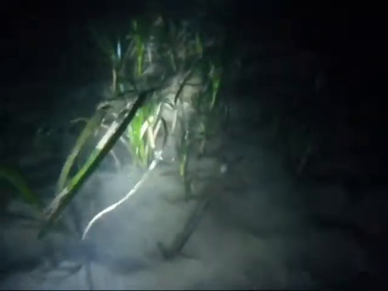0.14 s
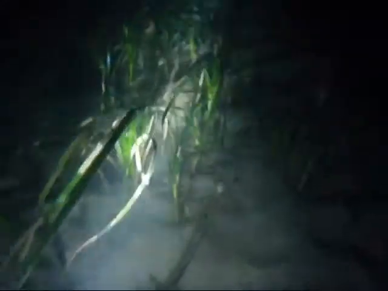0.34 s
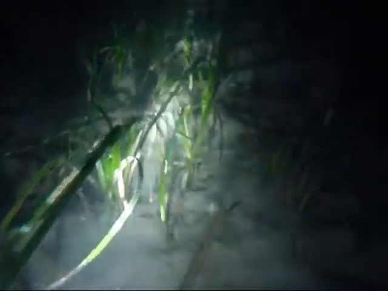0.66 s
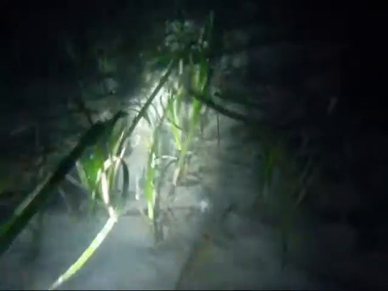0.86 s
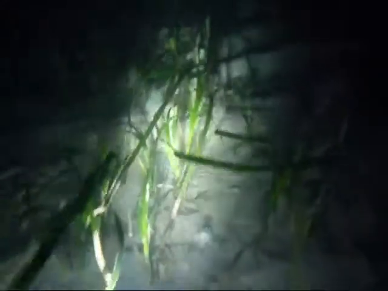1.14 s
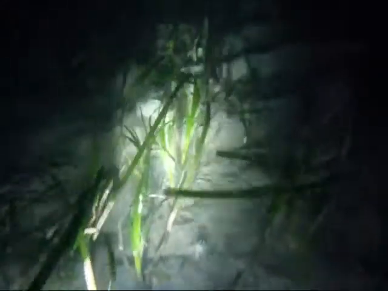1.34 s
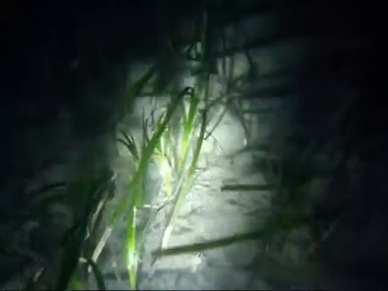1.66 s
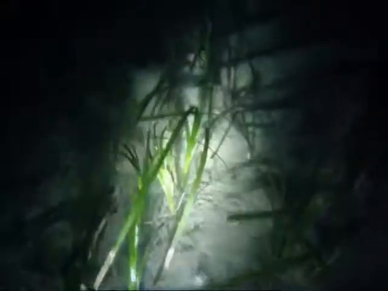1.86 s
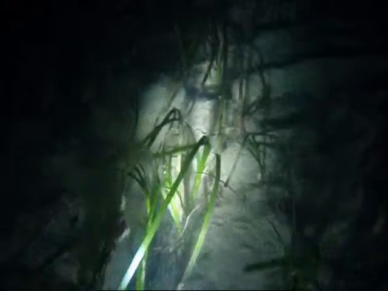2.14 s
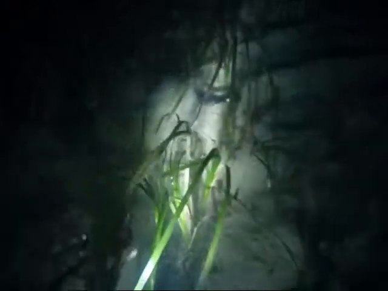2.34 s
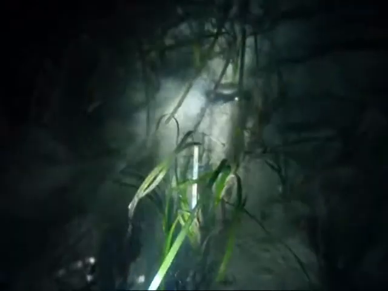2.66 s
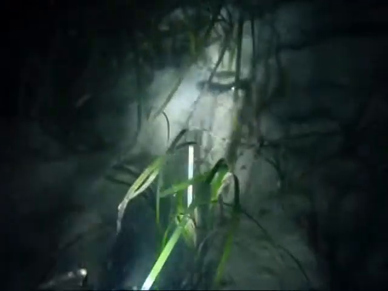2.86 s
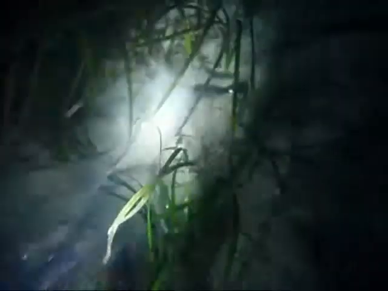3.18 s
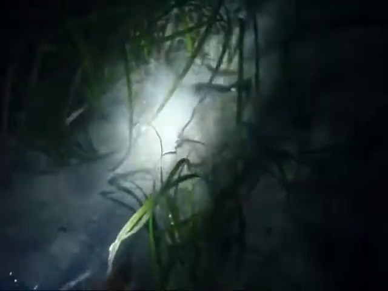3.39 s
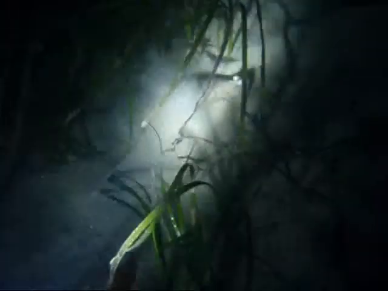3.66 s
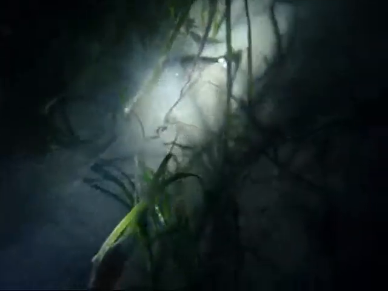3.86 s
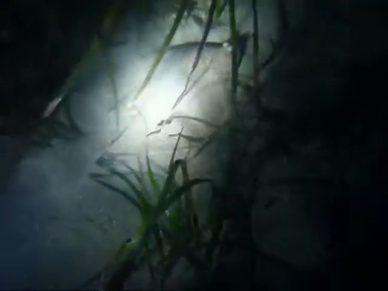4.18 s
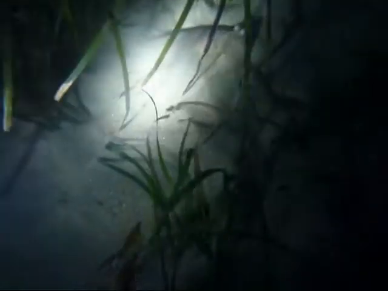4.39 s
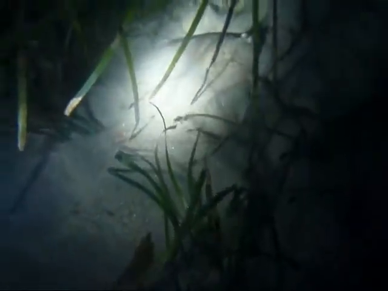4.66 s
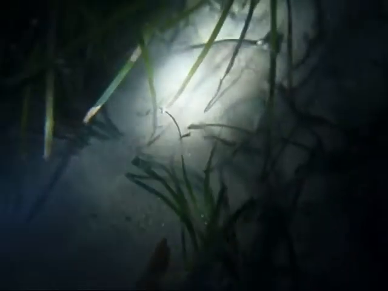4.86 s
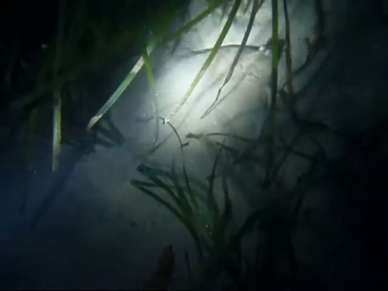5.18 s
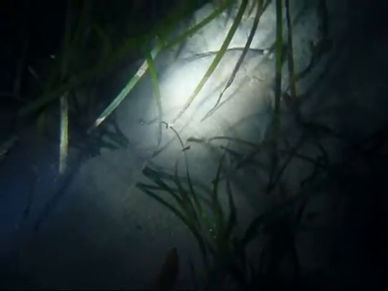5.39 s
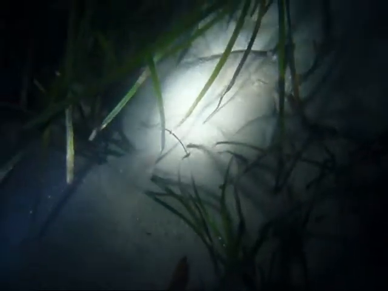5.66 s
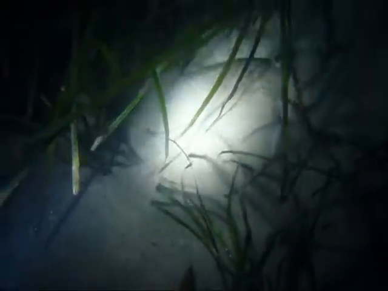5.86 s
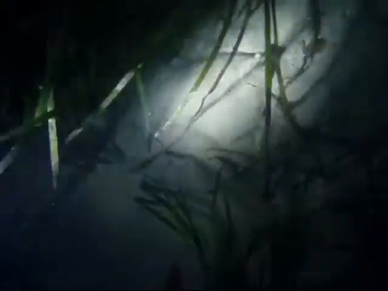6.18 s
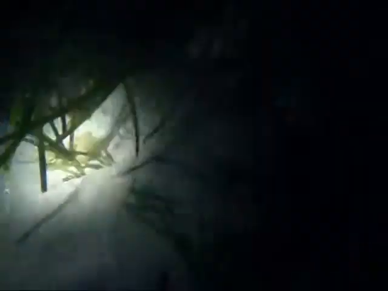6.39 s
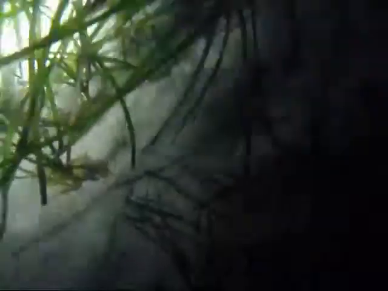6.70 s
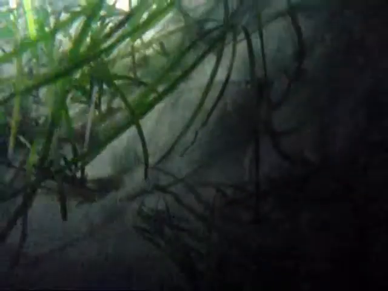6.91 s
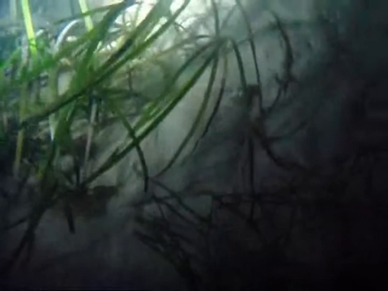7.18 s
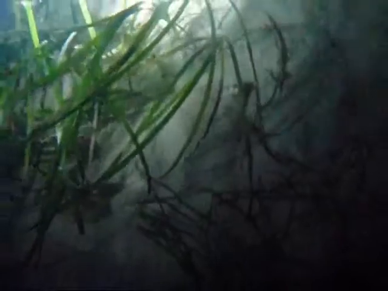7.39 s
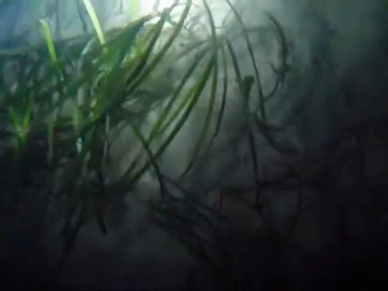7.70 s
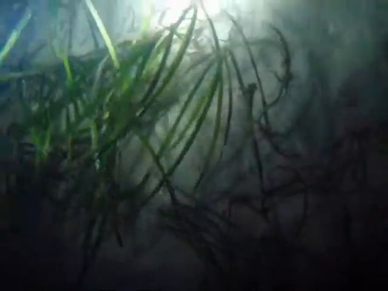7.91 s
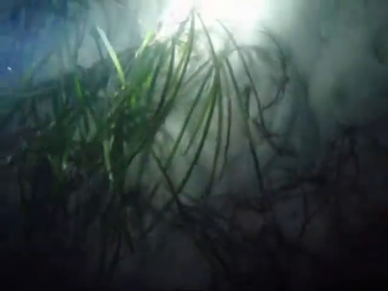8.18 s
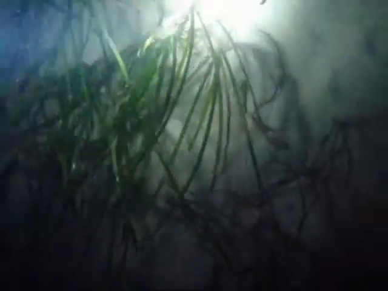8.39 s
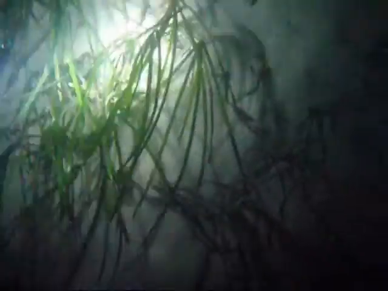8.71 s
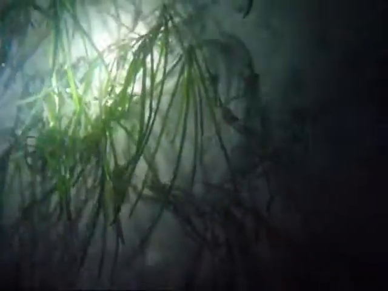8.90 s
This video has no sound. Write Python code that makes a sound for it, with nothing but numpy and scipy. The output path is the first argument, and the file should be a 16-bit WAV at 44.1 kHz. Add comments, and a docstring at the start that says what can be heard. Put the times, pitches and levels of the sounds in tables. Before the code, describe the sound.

A hand fumbles with a waterproof camera near the seabed. Very close, dull knocks ring briefly and sag in pitch, some with deep soft thumps. They begin sparse and quiet, bunch up several times, and end in weak taps after a strong knock around eight seconds. Soft friction, tiny stick-slip creaks and rising bubble blips fill gaps over constant crude microphone hiss.

```python
"""Fingers knock on a diver's sealed camera housing: short, damped, sagging tones, mostly under 1 kHz.
The hand also shoves it (slow, low blows), creaks along it (runs of small blows) and rubs it (shaped noise).
A few air bubbles blip nearby as rising, fading tones, over a steady microphone hiss of shaped noise.
The recorder keeps slow, coarse samples and holds each one, which puts a thin fizz on the knocks."""
import sys
import numpy as np
from scipy import signal
from scipy.fft import rfft, irfft, next_fast_len
from scipy.io import wavfile
from scipy.ndimage import uniform_filter1d

SR = 44100
rng = np.random.default_rng(int(sys.argv[2]) if len(sys.argv) > 2 else 0)


def master_out(mix):
    """Clip the mix to full scale and print it as 16-bit PCM to the path in sys.argv[1]."""
    frames = np.transpose(np.atleast_2d(mix))
    ceiling = np.clip(frames, -1, 1)
    pcm = np.round(ceiling * 32767).astype(np.int16)
    wavfile.write(sys.argv[1], SR, pcm)


N = 399105  # length of the scene in output samples, about 9 s
SAMPLE_HZ = 8000  # the recorder's own slow sampling rate


def gain_of(db):
    """Turns decibels into an amplitude factor."""
    return 10 ** (np.asarray(db) / 20)


def evened(x):
    """Scales a sound so that its average strength (rms) is 1."""
    return x / np.sqrt(np.mean(x ** 2) + 1e-20)


def add(mix, start_s, sound):
    """Adds a sound into the mix from a start time in seconds."""
    start = max(round(start_s * SR), 0)
    part = mix[start:][:len(sound)]
    part += sound[:len(part)]


def coloured(x, points):
    """Shapes a noise's spectrum by (Hz, dB) points, with nothing above half the recorder's rate, at rms 1."""
    hz = np.fft.rfftfreq(len(x), 1 / SR)
    point_hz, point_db = np.transpose(points)
    gain = gain_of(np.interp(np.log(hz + 1), np.log(point_hz), point_db))
    gain = gain * (hz < SAMPLE_HZ / 2)
    return evened(irfft(rfft(x) * gain, len(x)))


def blows(times, levels_db, pitches, lengths, sag, attack):
    """Soft blows on a shell damped by water: a few cycles swell and die while the pitch sags."""
    out = np.zeros(N)
    t = np.arange(-SR // 25, SR // 15) / SR  # seconds from the loudest moment
    attack = np.clip(attack, .1, .9)
    phases = rng.random(len(times))
    for s, db, hz, length, phase in np.broadcast(times, levels_db, pitches, lengths, phases):
        # length spans the two half-strength points; the swell takes the share attack, the decay the rest
        half_s = max(length, 1 / SAMPLE_HZ) * np.where(t < 0, attack, 1 - attack)
        u = np.clip(np.arccosh(2) * t / half_s, -60, 60)
        envelope = gain_of(db) / np.cosh(u)
        # bending waves: the high part arrives first
        turns = np.cumsum(hz * (1 - sag * np.tanh(u / 2))) / SR
        crest_s = s + (attack - .5) * length
        add(out, crest_s + t[0], envelope * np.sin(2 * np.pi * (turns + phase)))
    return out


def knocks(ring_db, wall_db, sway_db, snap_db, wall_lag_s, snap_lead_s):
    """Each knock snaps at first touch, rings the shell, bends the wall, rebounds and sways the whole housing."""
    # fingers knocking on the shell, levels before the shared trims: (time [s], ring level [dB],
    # ring pitch [Hz], wall level [dB], sway level [dB], snap level [dB])
    knock_table = [(0.048, -30, 559, -40, -23.5, -59), (0.567, -29.5, 495, -34.5, -28, -52),
                   (0.878, -27, 647, -36, -30, -31), (1.454, -28.5, 476, -27.5, -42, -53),
                   (1.580, -30.5, 506, -30, -44.5, -52), (1.804, -25, 645, -28, -37.5, -59),
                   (2.049, -11.5, 536, -10, -14.5, -47), (2.156, -17.5, 687, -17.5, -13.5, -34),
                   (2.183, -25.5, 548, -19.5, -26, -52), (2.191, -16, 536, -14.5, -19, -42),
                   (2.222, -23.5, 580, -11.5, -24, -52), (2.236, -21.5, 503, -27.5, -25, -53),
                   (2.322, -14.5, 460, -20.5, -23, -44), (2.338, -19.5, 567, -17, -24.5, -50),
                   (2.361, -22, 556, -26, -23, -40), (2.374, -22.5, 658, -22, -27.5, -51),
                   (2.504, -22, 672, -19.5, -25.5, -50), (2.887, -25.5, 623, -28.5, -40, -53),
                   (3.319, -18, 590, -33, -41, -46), (3.348, -14.5, 548, -20.5, -36.5, -57),
                   (3.391, -41.5, 686, -21.5, -25, -53), (3.506, -31, 523, -30, -35.5, -52),
                   (4.005, -21.5, 500, -28, -36, -50), (4.048, -16.5, 492, -11, -28, -46),
                   (4.126, -18, 504, -26.5, -25, -54), (4.170, -15.5, 655, -30, -34, -48),
                   (4.218, -26.5, 664, -20.5, -33, -49), (4.631, -24.5, 518, -31, -32, -54),
                   (4.720, -14.5, 570, -17.5, -19, -38), (4.794, -7, 493, -11.5, -19.5, -30),
                   (4.818, -23, 454, -20.5, -22, -55), (4.826, -15.5, 600, -24.5, -20, -31),
                   (4.837, -5.5, 591, -11, -16, -27.5), (4.856, -24.5, 620, -31, -34, -50),
                   (4.892, -27, 548, -37, -24.5, -52), (5.116, -21, 590, -26.5, -22.5, -44),
                   (5.494, -26, 605, -34, -32.5, -47), (5.721, -24, 660, -27.5, -36, -30.5),
                   (5.730, -23, 609, -35, -50, -51), (5.858, -23.5, 547, -55, -45, -55),
                   (5.865, -17, 667, -26, -35.5, -33), (6.073, -22.5, 483, -29.5, -45, -48),
                   (6.525, -30.5, 560, -30, -29, -55), (6.567, -26, 677, -48, -49, -52),
                   (6.637, -26.5, 663, -50, -44, -54), (6.856, -19.5, 623, -35, -52, -48),
                   (7.004, -25.5, 511, -28, -31.5, -52), (7.399, -31, 617, -45, -42, -52),
                   (7.937, -15, 655, -16, -35, -35), (7.96, -20, 676, -28, -36, -46),
                   (7.969, -9, 549, -16, -18, -27), (7.996, -21, 471, -25.5, -26.5, -50),
                   (8.027, -27, 587, -25, -29, -50), (8.114, -17, 530, -29, -40, -54),
                   (8.149, -25.5, 516, -23, -28.5, -52), (8.178, -26.5, 515, -34, -25.5, -52),
                   (8.223, -26, 468, -27.5, -34.5, -48), (8.649, -26, 623, -37, -37, -47),
                   (8.954, -26.5, 643, -29, -43, -52), (9.018, -25, 522, -24, -38, -48)]
    s, ring_level, ring_hz, wall_level, sway_level, snap_level = np.transpose(knock_table)
    ring_s = 0.0034  # ring length
    snap = blows(s - snap_lead_s, snap_level + snap_db, 1050, 0.0018, sag=0.17, attack=0.16)
    ring = blows(s, ring_level + ring_db, ring_hz, ring_s, sag=.1, attack=.47)
    # the finger rebounds and touches once more, softly: 9 ms later
    rebound = blows(s + .009, ring_level - 15, ring_hz, ring_s, sag=.1, attack=.45)
    wall = blows(s + wall_lag_s, wall_level + wall_db, 245.2, 0.0036, sag=.15, attack=0.36)
    sway = blows(s + 0.007, sway_level + sway_db, 124, 0.011, sag=.36, attack=0.32)
    return snap + ring + rebound + wall + sway


def thumps(level_db):
    """The palm's slower shoves sway the whole housing: longer, lower blows."""
    # shoves, levels before the shared trim: (time [s], level [dB])
    thump_table = [(0.36, -31), (0.80, -31), (1.394, -29), (1.71, -30.5), (1.905, -28.5), (2.488, -23),
                   (2.937, -30), (3.949, -27.5), (4.847, -20), (7.578, -30.5), (7.841, -32.5), (7.983, -21),
                   (8.071, -28), (8.62, -32.5)]
    s, db = np.transpose(thump_table)
    return blows(s, db + level_db, 86, 0.012, sag=.15, attack=.4)


def creaks(jitter, uneven_db, pitch_spread):
    """A dragged fingertip sticks and lets go in an uneven run of small blows that fade slightly."""
    # runs of slips, before the random unevenness:
    # (start [s], length [s], starting level [dB], rate [slips per s])
    creak_table = [(2.463, .035, -25, 83), (2.809, .06, -32.5, 95), (4.915, .065, -25, 102),
                   (5.109, .06, -26, 84), (5.217, .07, -30, 75), (6.042, 0.05, -31.5, 130),
                   (7.287, .04, -29.5, 90), (8.486, .03, -35, 85)]
    out = np.zeros(N)
    fade_db = -1  # over the whole run
    chances = rng.uniform(-1, 1, size=(len(creak_table), 3, 16))
    for (start, length, db, per_s), (gap, force, place) in zip(creak_table, chances):
        t = np.cumsum(1 + jitter * gap) / per_s
        t = t - t[0]
        live = t <= length
        levels_db = db + fade_db * t / length + uneven_db * force
        hz = 457.7 * (1 + pitch_spread * place)
        out += blows(start + t[live], levels_db[live], hz[live], 0.0037, sag=.15, attack=.35)
    return out


def slips(count, per_s, spread_db, smooth):
    """Tiny slips of skin, of uneven size and at random moments, over a smooth friction noise."""
    sizes = gain_of(spread_db * np.minimum(rng.exponential(1, count), 3))
    signs = rng.choice([-1, 1], count)
    happens = rng.random(count) < per_s / SR
    clicks = sizes * signs * happens
    return evened(clicks) + smooth * rng.standard_normal(count)


def tremor():
    """The resting grip tightens and eases at random: a slow gain around 1."""
    size = max(round(.045 * SR), 1)  # smoothing span of 45 ms, used twice
    drift = uniform_filter1d(uniform_filter1d(rng.standard_normal(N), size), size)
    return gain_of(3 * np.clip(evened(drift), -2, 2))  # typically 3 dB, at most 6 dB either way


def handling():
    """Strokes swell, hold and fade over a resting grip, driving the low sway, the walls and the hollow ring."""
    # strokes along the housing, levels before the trim:
    # (start [s], length [s], pushing level [dB], wall flexing level [dB], sliding level [dB])
    rub_table = [(0.026, 0.1, -39.5, -39, -45.5), (0.532, 0.11, -42, -40, -48.5),
                 (0.747, .07, -48, -46, -43), (1.319, 0.074, -47, -56, -45.5),
                 (2.133, 0.07, -34.5, -37, -39.5), (2.288, 0.12, -35, -40.5, -43),
                 (2.441, 0.2, -42, -42, -44), (2.789, 0.1, -40, -39.5, -48.5),
                 (3.259, 0.062, -49, -43, -38.5), (3.354, 0.083, -39, -40, -46.5),
                 (3.507, 0.15, -44, -44, -46), (3.754, 0.078, -39, -37, -41),
                 (3.852, 0.11, -45, -40.5, -44), (3.987, 0.28, -41.5, -41, -41),
                 (4.323, 0.25, -46, -42.5, -39), (4.892, .12, -37.5, -41.5, -46.5),
                 (5.087, 0.24, -40, -40.5, -47.5), (5.373, 0.099, -49.5, -41, -42),
                 (5.768, 0.096, -46.5, -36, -44), (5.946, 0.24, -46, -39, -37),
                 (6.196, .09, -44.5, -48, -39), (6.337, 0.33, -47, -51, -41),
                 (6.727, 0.18, -48.5, -41, -48), (6.999, 0.15, -43, -44, -41),
                 (7.273, .07, -39.5, -41.5, -49.5), (7.761, 0.21, -44, -39.5, -43.5),
                 (7.975, .19, -39, -39.5, -43), (8.302, 0.071, -47, -51, -45),
                 (8.472, 0.18, -42, -42.5, -49.5), (8.721, 0.15, -42, -42, -45.5),
                 (8.993, 0.066, -45, -41, -43)]
    # what the housing passes of the hand's pushing: (frequency [Hz], relative level [dB])
    push_colour = [(20, -24.5), (35, -14.5), (55, -5), (80, 2.5), (105, -2), (150, -6), (190, -13),
                   (280, -44.5)]
    # what it passes of its walls flexing: (frequency [Hz], relative level [dB])
    flex_colour = [(110, -22.5), (165, -1), (210, 3), (280, 2.5), (360, -2), (420, -3.5), (540, -39.5)]
    # what it passes of the hand's sliding: (frequency [Hz], relative level [dB])
    slide_colour = [(300, -32.5), (420, -11), (520, -2.5), (630, 4), (720, -4), (820, -11.5), (1000, -20.5),
                    (1400, -40.5)]
    attack_s, release_s = 0.018, .035
    trim = gain_of(-1.5)

    t = np.arange(N) / SR
    friction = slips(next_fast_len(N), per_s=450, spread_db=3.0, smooth=.45)
    # the resting hand never lies quite still: push, flex and slide levels in dB before the trim
    hold = gain_of([[-46], [-50], [-48.5]]) * tremor()
    power = hold ** 2
    for start, length, *levels_db in rub_table:
        rise = (t - start) / attack_s
        fall = (start + length - t) / release_s
        stroke = np.clip(np.minimum(rise, fall), 0, 1)
        power += np.outer(gain_of(levels_db) ** 2, stroke)
    push, flex, slide = np.sqrt(power)
    rumble = trim * push * coloured(friction, push_colour)[:N]
    walls = trim * flex * coloured(friction, flex_colour)[:N]
    ring = trim * slide * coloured(friction, slide_colour)[:N]
    return rumble + walls + ring


def bubbles(level_db, swell_s, climb_per_s):
    """A freed air bubble pulses at its own pitch, which climbs as it dies away."""
    # bubbles breaking loose, levels before the shared trim:
    # (time [s], level [dB], starting pitch [Hz], time to fade by 60 dB [s])
    bubble_table = [(4.366, -14, 629, 0.097), (4.382, -21, 667, 0.048), (6.099, -22, 604, 0.085),
                    (6.129, -24, 588, 0.11), (6.927, -16.5, 490, 0.14), (7.014, -19.5, 470, .14),
                    (7.070, -21.5, 525, 0.052), (7.126, -19.5, 511, 0.059)]
    out = np.zeros(N)
    t = np.arange(SR // 5) / SR
    for s, db, hz, t60 in bubble_table:
        turns = np.cumsum(hz * (1 + climb_per_s * t)) / SR
        level = gain_of(db + level_db - 60 * t / t60) * np.tanh(t / swell_s)
        add(out, s, level * np.sin(2 * np.pi * turns))
    return out


def hiss():
    """The microphone's even self-noise: random noise with a fixed colour."""
    # colour of the self-noise: (frequency [Hz], relative level [dB per Hz])
    hiss_colour = [(20, 0.5), (100, 1.5), (400, 4.5), (1000, -1.5), (1500, -3.5), (2000, -6.5), (2500, -9),
                   (3000, -15.5), (3900, -24)]
    noise = rng.standard_normal(next_fast_len(N))
    return gain_of(-47.5) * coloured(noise, hiss_colour)[:N]


def scene():
    """Adds all the sounds together at the one microphone."""
    hits = knocks(ring_db=1.5, wall_db=0.5, sway_db=-0.5, snap_db=1.0, wall_lag_s=.0004, snap_lead_s=0.0003)
    hits = hits + thumps(level_db=-0.5) + creaks(jitter=.3, uneven_db=3.5, pitch_spread=0.14)
    # the blows lose their slowest pressure changes, below about 40 Hz
    low_cut = signal.butter(2, 40, "highpass", fs=SR, output="sos")
    hits = signal.sosfilt(low_cut, hits)
    bed = handling() + hiss()
    blips = bubbles(level_db=-3.0, swell_s=0.0042, climb_per_s=3.6)
    return (hits + bed + blips)[None]


def record(dry):
    """Slow samples, held and rounded down to coarse steps, mirror the low sound into the treble."""
    t = np.arange(N) / SR
    # each moment takes the value of the nearest slow sample
    held_s = np.round(np.arange(N) * SAMPLE_HZ / SR) / SAMPLE_HZ
    held = np.interp(held_s, t, dry[0])
    step = 1 / 128  # step height of 8-bit sound
    steps = step * np.floor(held / step)
    # a faint, even sizzle lies under the steps
    sizzle = gain_of(-68.0) * rng.standard_normal(N)
    # a steep filter removes the treble above about 15750 Hz
    edge = signal.firwin(255, 15750, window=("kaiser", 8), fs=SR)
    return signal.oaconvolve(steps + sizzle, edge, "same")[None]


dry = scene()
out = record(dry)
master_out(out)
```